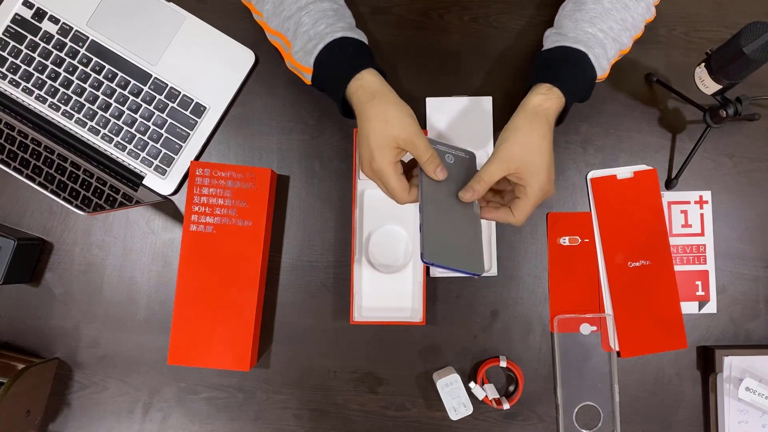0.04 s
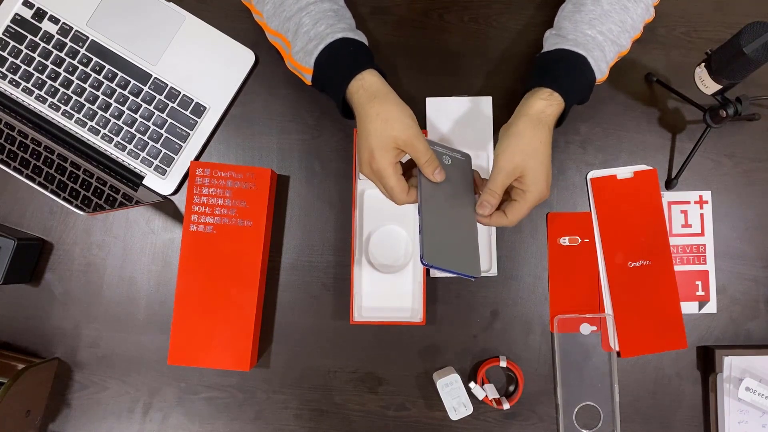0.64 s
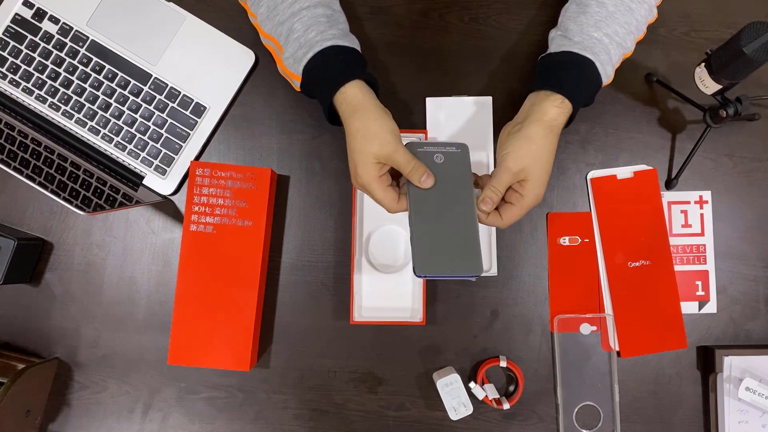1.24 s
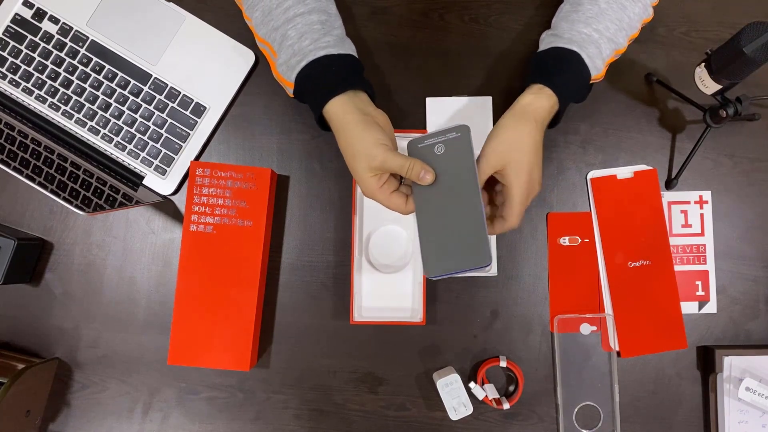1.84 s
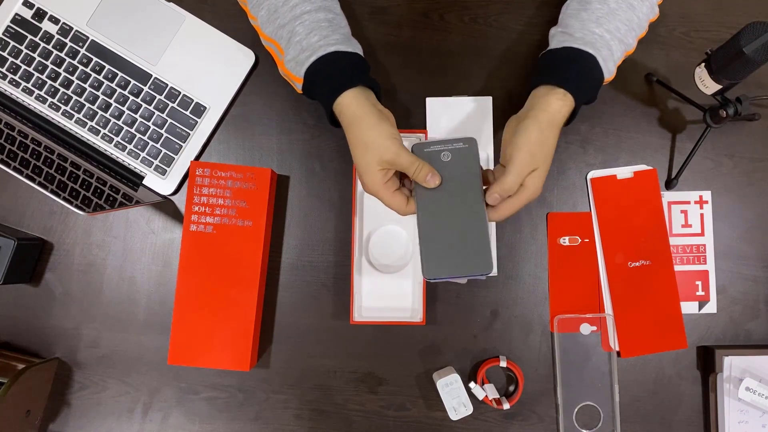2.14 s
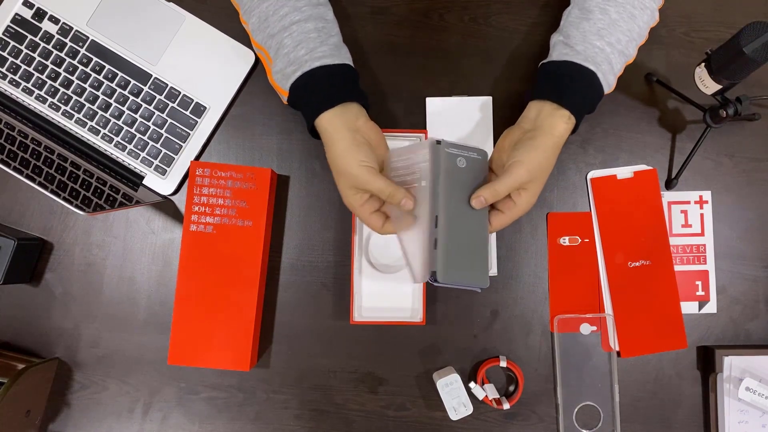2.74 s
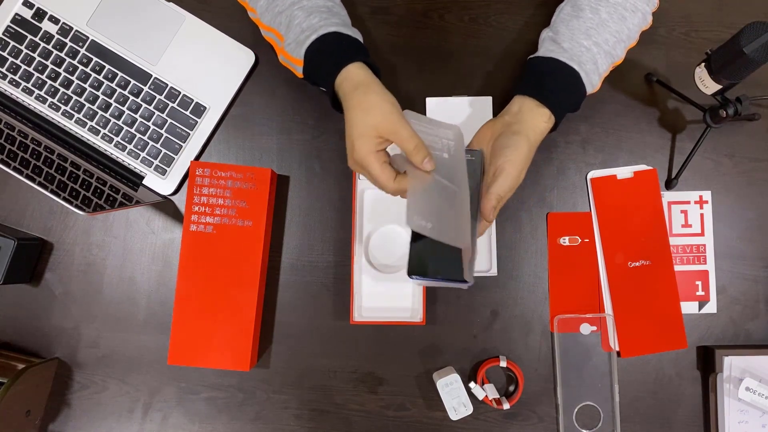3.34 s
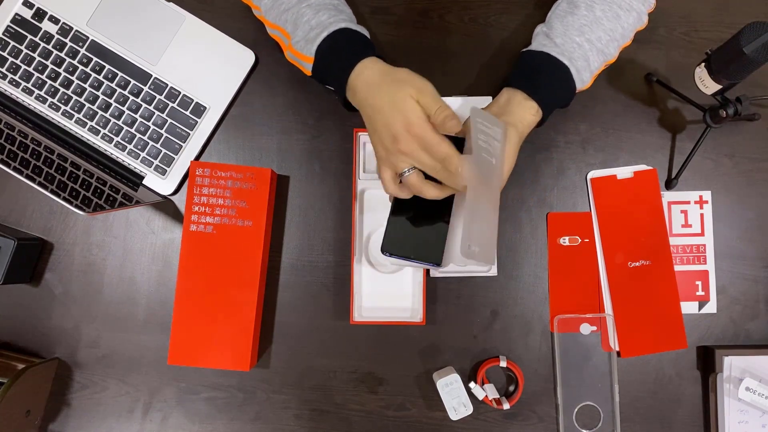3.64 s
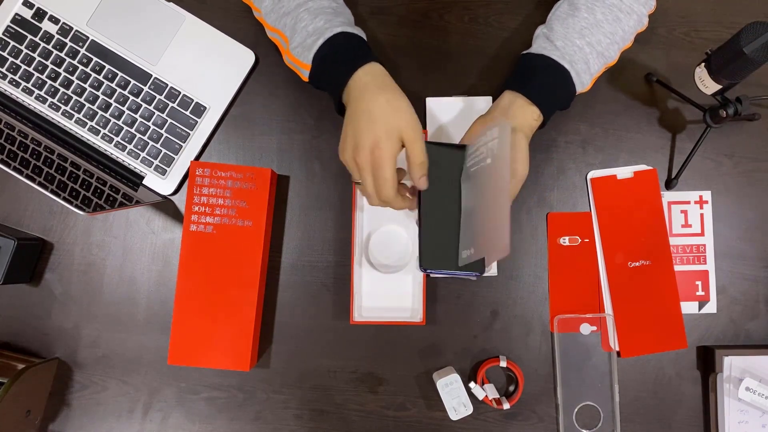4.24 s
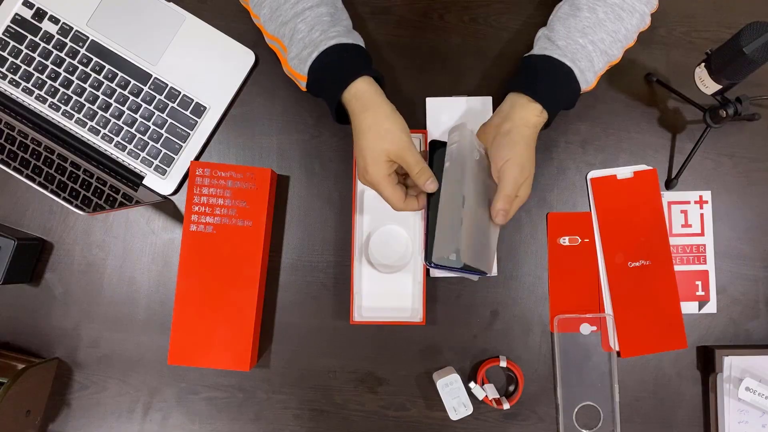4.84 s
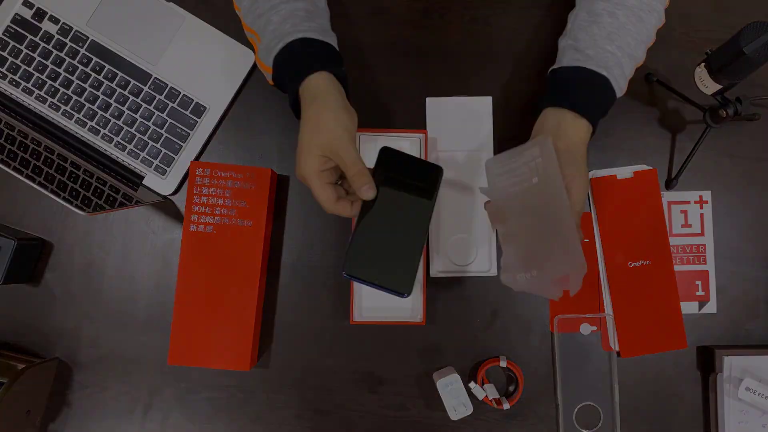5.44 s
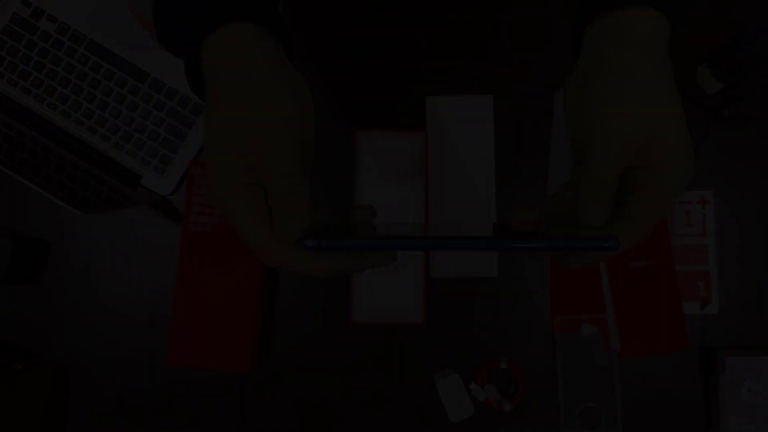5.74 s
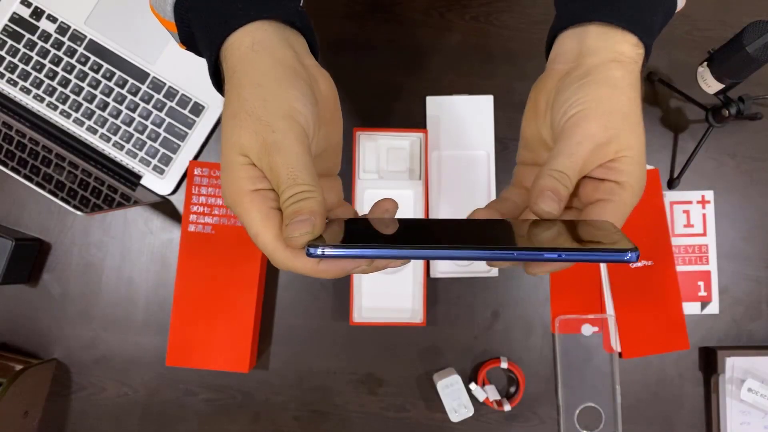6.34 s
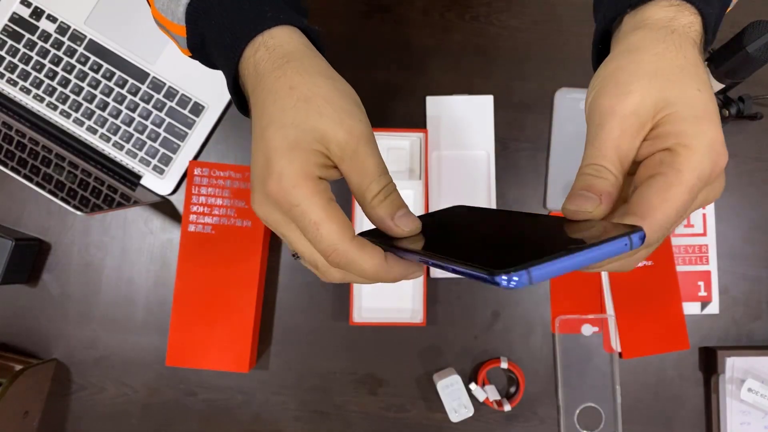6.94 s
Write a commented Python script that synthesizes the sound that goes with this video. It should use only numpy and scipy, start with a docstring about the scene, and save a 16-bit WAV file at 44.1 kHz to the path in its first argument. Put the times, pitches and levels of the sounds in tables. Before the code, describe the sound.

A thin plastic sleeve crackles and hisses as a phone is slid out, with soft bumps over a low room hum.

```python
"""A thin plastic sleeve crackles as a phone is slid out of it above a desk in a small room.
Creases buckle and ring the film's modes in sharp snaps, wrinkles pop as it bends, and stick-slip friction
makes it hiss and judder. Soft bumps set the desk or the hollow sleeve into damped vibration.
Hum and rumble lie underneath. Just after the crackling stops they drop abruptly to a much quieter
background with a thin tone, over which fingertips faintly brush the bare phone."""
import sys
import numpy as np
from scipy import signal
from scipy.fft import rfft, irfft, next_fast_len
from scipy.io import wavfile
from scipy.ndimage import uniform_filter1d

SR = 44100
rng = np.random.default_rng(int(sys.argv[2]) if len(sys.argv) > 2 else 0)


def file_out(sig):
    """Save sig as 16-bit WAV at sys.argv[1]."""
    # one column per channel
    cols = np.atleast_2d(sig).T
    # limit, then scale
    lim = np.clip(cols, -1, 1)
    pcm = np.round(lim * 32767).astype(np.int16)
    wavfile.write(sys.argv[1], SR, pcm)


N = 307801
TIME = np.arange(N) / SR
HANDLING_END_S, DROP_S = 5.63, 5.763
SNAP_WINDOW_S = .005  # a snap's level states its energy spread over this time


def undb(db):
    """Amplitude ratio of a level in decibels."""
    return 10 ** (np.asarray(db) / 20)


def unit(x):
    """Normalisation to an rms of 1."""
    return x / np.sqrt(np.mean(x ** 2) + 1e-20)


def add(track, sound, start_s):
    """Superposition: a sound joins the track at start_s."""
    i = max(int(start_s * SR), 0)
    track[i:i + len(sound)] += sound[:max(N - i, 0)]


def until(end_s):
    """A gate whose gain ramps from 1 to 0 in about 5 ms."""
    return np.clip((end_s - TIME) / 0.0051 + .5, 0, 1)


def walk(rate):
    """Slow random modulation: smoothed steps, rate per second, with an rms of 1."""
    hold = max(int(SR / rate), 1)
    steps = np.repeat(rng.standard_normal(N // hold + 1), hold)[:N]
    return unit(uniform_filter1d(uniform_filter1d(steps, hold), hold))


def strokes(rows):
    """Amplitude envelope of sliding motion: one Gaussian swell for each stroke."""
    return sum(undb(db) * np.exp(-((TIME - peak_s) / spread_s) ** 2) for peak_s, spread_s, db in rows)


def grains(size, rate, spread_db):
    """Shot noise: random impulses, rate per second, most small and a few large."""
    out = np.zeros(size)
    count = max(int(rate * size / SR), 1)
    where, height, sign = rng.random((count, 3)).T
    level_db = spread_db * np.minimum(-np.log(1 - height), np.pi)
    out[(where * size).astype(int)] = np.sign(sign - .5) * undb(level_db)
    return out


def colour(x, outline):
    """Minimum-phase filter, from the folded cepstrum of an outline of (frequency_hz, gain_db)."""
    size = next_fast_len(len(x) + 8192, True)
    hz, db = np.transpose(outline)
    gain = undb(np.interp(np.log(np.fft.rfftfreq(size, 1 / SR) + 1), np.log(hz), db))
    cepstrum = irfft(np.log(gain), size)
    cepstrum[1:size // 2] *= 2
    cepstrum[size // 2:] = 0
    return irfft(rfft(x, size) * np.exp(rfft(cepstrum)), size)[:len(x)]


def resonate(x, hz, width_hz):
    """Two resonators in cascade give one resonance with steep skirts; rms 1."""
    band = signal.iirpeak(min(hz, .45 * SR), hz / (1.5 * width_hz), fs=SR)
    return unit(signal.lfilter(*band, signal.lfilter(*band, x)))


def hum_and_air(tones, spectrum, air_db):
    """Tones waver in amplitude and phase over gently swelling coloured noise."""
    out = undb(air_db + .5 * walk(rate=6)) * unit(colour(rng.standard_normal(N), spectrum))
    for hz, db, waver in tones:
        phasor = (1 + waver * (walk(rate=4.5) + 1j * walk(rate=4.6))) / np.sqrt(1 + 2 * waver ** 2)
        phase = 2 * np.pi * (hz * TIME + rng.random())
        out += np.sqrt(2) * undb(db) * np.abs(phasor) * np.sin(phase + np.angle(phasor))
    return out


def background():
    """The noise floor: a rapid crossfade takes hum and rumble down to faint noise and a thin tone."""
    # room tones before and after the drop: pitch_hz, level_db, waver_ratio
    hum = [(22, -48.5, 0.1498), (101, -48, 0.074), (119, -64, 0.72), (180.6, -64.5, 0.5),
           (205.6, -66.5, 0.93), (305.7, -67.5, .5)]
    quiet_hum = [(206, -69, .03), (243, -85.5, 0.28), (370, -84, .3)]
    # room noise spectra before and after the drop: frequency_hz, gain_db
    air = [(15, -3.5), (28, 2), (55, -3), (85, -6.5), (140, -8), (230, -5), (320, -7.5), (420, -14),
           (600, -14.5), (850, -23), (1500, -26), (3000, -38.5), (9000, -40.5), (16000, -46)]
    quiet_air = [(18, -20), (32, -11), (50, 6.5), (80, -1), (150, -2), (280, -4), (500, 1.5), (800, -7.5),
                 (1400, -14), (4000, -21), (11500, -28.5), (14000, -41)]
    loud = hum_and_air(hum, air, air_db=-50.5)
    quiet = hum_and_air(quiet_hum, quiet_air, air_db=-72.5)
    gate = until(DROP_S)
    return gate * loud + (1 - gate) * quiet


def room(x, wall_s=0.0155, wall_db=-13, scatter_s=0.0032, build_s=0.0072, split_hz=6500):
    """Reverberation: a near wall's scattered reflection and a short tail whose treble dies first."""
    t = np.arange(SR * 2 // 3) / SR
    noise = rng.standard_normal(len(t))
    dull = signal.sosfiltfilt(signal.butter(2, split_hz, fs=SR, output="sos"), noise)
    wall = rng.standard_normal(len(t)) * (t > wall_s) * np.exp(-np.abs(t - wall_s) / scatter_s)
    response = undb(wall_db) * wall / np.linalg.norm(wall)
    for band, db, t60_s in ((dull, -8, 0.49), (noise - dull, -10.5, 0.36)):
        fade = np.exp(-np.log(1000) * t / t60_s) * (1 - np.exp(-t / build_s))
        response += undb(db) * band * fade / np.linalg.norm(fade)
    return signal.fftconvolve(x, response)[:N]


def fingers():
    """Friction noise: fingertips brush the bare phone in soft, uneven strokes."""
    # fingertip strokes: peak_s, spread_s, level_db
    brushes = [(5.8, 0.024, -74), (5.92, 0.039, -81), (6.18, .04, -82), (6.369, .06, -84.5),
               (6.76, 0.036, -85), (6.86, 0.026, -86)]
    # spectrum of skin on glass: frequency_hz, gain_db
    skin = [(800, -7), (4000, -2.5), (11000, -9), (14000, -19)]
    grip_db = 2 * walk(rate=90)
    return strokes(brushes) * undb(grip_db) * unit(colour(rng.standard_normal(N), skin))


def bumps(rise_cycles=.3):
    """Damped oscillation: soft contacts set the desk or the hollow of the sleeve swinging."""
    # soft thumps: start_s, level_db, pitch_hz, t60_s
    thumps = [(0.512, -37.5, 45, 0.8), (0.962, -28, 103, 0.05), (1.407, -25, 54, 0.18),
              (2.919, -39, 42.7, .4), (4.13, -40, 32.4, 0.53), (4.644, -42, 540, .04),
              (6.29, -59.5, 54.8, .35)]
    out, t = np.zeros(N), np.arange(SR // 2) / SR
    for start_s, db, hz, t60_s in thumps:
        swell = (1 - np.exp(-t * hz / rise_cycles)) ** 2 * np.exp(-np.log(1000) * t / t60_s)
        add(out, undb(db) * swell * np.sin(2 * np.pi * hz * t), start_s)
    return out


def film_radiation(x, cutoff_hz=340):
    """A light sheet radiates bass poorly, so it acts as a high-pass filter."""
    return signal.sosfilt(signal.butter(4, cutoff_hz, "highpass", fs=SR, output="sos"), x)


def effort(time_s):
    """The bending drive on the sleeve at time_s, in dB."""
    # how hard the hands bend the film: time_s, effort_db
    bends = [(0, -81), (1.0, -71), (1.58, -66.5), (1.69, -60.5), (1.83, -62.5), (1.92, -59), (2.02, -62),
             (2.19, -68.5), (2.27, -60), (2.47, -57.5), (2.62, -74), (2.74, -60), (3.0, -48.5),
             (3.1, -57.5), (3.55, -59.5), (4.05, -59), (4.18, -76), (4.3, -62), (4.96, -63), (5.03, -59),
             (5.38, -61.5), (5.62, -63)]
    return np.interp(time_s, *np.transpose(bends))


def rustle(bend_db=-2, slide_db=-1.5, creep_db=-6):
    """Bending buckles tiny wrinkles; sliding over glass and skin makes a hiss of stick-slip ticks."""
    # wrinkle resonances: pitch_hz, width_hz, level_db
    wrinkles = [(784, 470, 1.5), (1644, 680, -2.5), (2120, 440, 0.5), (2970, 750, -0.5), (3900, 820, 0.5),
                (4610, 1200, -5.5)]
    # strokes of the sliding film: peak_s, spread_s, level_db
    slides = [(.06, 0.053, -67.5), (.455, 0.013, -59), (.55, 0.088, -69), (1.075, 0.018, -59),
              (1.32, 0.23, -64), (2.12, 0.041, -56.5), (2.23, 0.052, -56), (2.47, 0.044, -50.5),
              (2.775, 0.042, -57.5), (3.21, 0.11, -53.5), (3.46, 0.16, -60.5), (3.578, 0.015, -49.5),
              (3.71, 0.075, -59), (3.895, 0.045, -56), (4.072, 0.022, -48), (4.245, 0.026, -52.5),
              (4.35, 0.048, -60.5), (4.5, 0.077, -55.5), (4.68, 0.022, -53.5), (4.87, 0.046, -60),
              (5.12, 0.094, -57), (5.57, 0.017, -52.5)]
    # spectrum of the sliding hiss: frequency_hz, gain_db
    hiss_spectrum = [(1000, -28), (3000, 0), (4600, -0.5), (6400, 1), (8700, 3.5), (11000, -1.5),
                     (13500, -2), (16000, -13)]
    bending = undb(effort(TIME))
    sliding = np.hypot(strokes(slides), undb(creep_db) * bending)  # bent film also creeps in the grip
    grip_db = 1.8 * walk(rate=110)
    # small, high wrinkles pop more often than large ones
    crackle = unit(sum(undb(db) * resonate(grains(N, rate=.13 * hz, spread_db=4), hz, width_hz)
                       for hz, width_hz, db in wrinkles))
    ticks = unit(grains(N, rate=12000, spread_db=6))
    catches = unit(grains(N, rate=150, spread_db=3))
    hiss = unit(colour(ticks + .48 * catches, hiss_spectrum))
    return (crackle * bending * undb(bend_db) + hiss * sliding * undb(slide_db)) * undb(grip_db)


def rubs():
    """Uneven stick-slip pulses drive the resonance of a stretched panel, swelling and dying away."""
    # film juddering on glass or fingers: peak_s, rise_s, fall_s, level_db, pitch_hz, width_hz
    judders = [(1.89, 0.03, .05, -60, 790, 700), (1.886, 0.016, .025, -60, 2700, 1000),
               (2.426, 0.027, .035, -52, 2300, 803), (2.9, 0.026, 0.071, -51, 2750, 1100),
               (3.02, 0.022, 0.046, -46, 2750, 890), (2.408, 0.0065, 0.05, -46, 4200, 1500),
               (2.43, 0.027, 0.044, -55, 570, 420), (2.1, 0.018, 0.09, -61, 7300, 1100),
               (2.895, 0.03, 0.051, -48, 980, 650), (3.23, 0.066, 0.09, -59, 9100, 640),
               (3.039, 0.074, 0.095, -57, 1000, 900), (3.6, 0.051, 0.052, -53.5, 2300, 700),
               (3.55, .08, .08, -63, 2100, 600), (3.73, .06, 0.047, -59, 2400, 540),
               (4.078, .014, 0.018, -52, 6900, 700), (4.462, 0.02, 0.02, -54.5, 4070, 700),
               (5.179, 0.02, 0.018, -65, 1450, 450), (4.8, .02, .026, -60, 1650, 450)]
    out, t = np.zeros(N), np.arange(-SR // 4, SR // 2) / SR
    for peak_s, rise_s, fall_s, db, hz, width_hz in judders:
        judder = resonate(grains(len(t), rate=700, spread_db=8), hz, width_hz)
        swell = np.exp(-np.where(t < 0, (t / rise_s) ** 2, t / fall_s))
        add(out, undb(db) * judder * swell, peak_s + t[0])
    return out


def taut_panels():
    """Directional radiation: taut panels facing away from the listener ring briefly into the room."""
    # pings of snapping panels: start_s, level_db, pitch_hz, width_hz
    pings = [(1.405, -35.5, 4220, 850), (2.103, -45, 7600, 1300), (2.9353, -38.5, 4600, 1100),
             (4.084, -43.5, 5680, 350), (4.0837, -45, 4020, 501.4), (4.0834, -49, 2300, 300),
             (4.4733, -38, 9100, 1100), (4.6442, -41, 1560, 800)]
    out, flick = np.zeros(N), signal.unit_impulse(1024)
    for start_s, db, hz, width_hz in pings:
        ping = resonate(flick, hz, width_hz) * np.sqrt(SNAP_WINDOW_S * SR / len(flick))
        add(out, undb(db) * ping, start_s)
    return out


def ring(modes, buckle_ms, slip=0.38, detune=0.029):
    """Modal response: a jump and a fading run of smaller slips excite each damped mode; rms 1."""
    size = 512
    t = np.arange(size) / SR
    hz, width_hz, db = np.transpose(modes)[:, :, None]
    push = slip * rng.standard_normal((len(hz), size)) * np.exp(-t * 1000 / (0.39 + 1.3 * buckle_ms))
    push[:, 0] = rng.choice([-1, 1], len(hz))
    tuned_hz = hz * (1 + detune * rng.standard_normal(hz.shape))
    decay = np.exp(-np.pi * width_hz * t) * np.sin(2 * np.pi * tuned_hz * t)
    jf = 1j * np.fft.rfftfreq(2 * size, 1 / SR)
    radiation = (jf / (jf + 0.37 * hz)) ** 3  # a small sheet radiates little below its resonance
    swing = irfft(rfft(push, 2 * size) * rfft(decay, 2 * size) * radiation)[:, :size]
    return unit(np.sum(undb(db) * swing / swing.std(axis=1, keepdims=True), axis=0))


def all_around(snap, blur_hz=2200, lowest_hz=600):
    """Averaging over all directions blurs a snap's peaks and notches into a smooth power spectrum."""
    spectrum, hz = rfft(snap, 2 * len(snap)), np.fft.rfftfreq(2 * len(snap), 1 / SR)
    power = np.abs(uniform_filter1d(np.abs(spectrum) ** 2, max(int(blur_hz / hz[1]), 1)))
    bass_cut = hz ** 2 / (hz ** 2 + lowest_hz ** 2)
    return irfft(np.sqrt(power) * np.exp(1j * np.angle(spectrum)) * bass_cut)


def faint_creases(most_per_s=8, busy_db=-61, median_hz=2400, spread_octaves=0.78,
                  facet_db=-2.5, buckle_ms=2.6, own_db=-1.5):
    """A random point process: harder bending buckles small creases more often and more loudly."""
    candidates = 400
    when, luck = rng.random((candidates, 2)).T
    strength, pitch = rng.standard_normal((candidates, 2)).T
    start_s = when * HANDLING_END_S
    per_s = most_per_s * np.minimum(undb(effort(start_s) - busy_db), 1)
    level_db = effort(start_s) + 6 + 0.5 * strength
    own_hz = np.minimum(median_hz * 2 ** (spread_octaves * pitch), SR / 4)
    chosen = np.flatnonzero(luck < per_s * HANDLING_END_S / candidates)
    return [(start_s[i], level_db[i], facet_db, buckle_ms, own_hz[i], own_db) for i in chosen]


def snaps(middle_crease_hz=2980, forceful_db=-31, hard_db=-26, aimed_db=-35):
    """Snap-through buckling of creases rings the film; returns the direct sound and the room's share."""
    # loud creases: start_s, level_db, facet_db, buckle_ms, own_hz, own_db
    # facet_db is relative to the middle modes; own_db, the crease's own ring, to all the film's modes
    creases = [(.1819, -54.5, 4, 0.76, 3670, -9), (.2593, -49, 18, 1.6, 7200, -10),
               (.4985, -61, 9, 2.5, 8000, -6), (1.3451, -49, 3, 1.2, 1700, -6),
               (1.4051, -28, 6, 0.68, 4500, 1.5), (1.6523, -48, -11, 1.7, 1830, -2),
               (1.683, -51, -11, 3, 1900, -7), (1.7363, -42.5, -21, 1.1, 1600, -5),
               (1.8223, -54, -14, 1, 3640, -3), (1.839, -41.5, -9, 0.76, 3845, 4),
               (1.8554, -34, -6, 0.98, 4100, -7), (1.8748, -38, -4, 2.3, 3400, 0),
               (1.883, -43, -3, 1, 2000, -1), (1.8962, -36.5, 7, 1.2, 3120, 4.5),
               (1.9239, -32.5, 10, 3.9, 1850, -4), (1.933, -32, 2, 0.26, 7100, -1),
               (1.954, -45.5, -6, 1.4, 3470, 12), (2.1036, -42.5, 2.5, 2.7, 5540, -1),
               (2.2772, -47, -18, 4.7, 1540, -5), (2.302, -48.5, -14, 1.2, 3130, 1),
               (2.3527, -28, -8, 0.63, 8500, -0.5), (2.3573, -34, 7, 1.2, 3925, 3),
               (2.4274, -43, 3, 1, 1983, -5), (2.4432, -41.5, -13, 3.1, 3970, -4),
               (2.4731, -44, -8, 0.44, 2310, -6), (2.703, -54.5, 9.5, 1, 5170, 1),
               (2.7404, -46, -12, 2.1, 840, -1.5), (2.838, -44.5, 4, 6, 4350, 1),
               (2.8642, -35.5, -6, 4.1, 3770, 2), (2.8678, -31, -5, 1.6, 1390, -7),
               (2.883, -45, -3, 1.8, 4300, 0), (2.8953, -37, -4, 2.3, 3700, -4),
               (2.9032, -35, 1, 1.4, 990, 1), (2.917, -43, -6, 0.8, 4800, 1),
               (2.9279, -29.5, 0.5, 0.52, 3720, -3), (2.9353, -27.5, 1, 1.3, 5000, 1.5),
               (2.943, -38, 3, 0.9, 5000, -1), (3.0017, -30, 0, 1.2, 3350, -3.5),
               (3.017, -46.5, 0, 2, 2960, -2), (3.0324, -39.5, 6, 1.8, 3940, 1),
               (3.059, -48, -3, 1, 3300, 1), (3.0779, -48, -12, 0.91, 3890, 4),
               (3.1021, -34.5, -20, 1.2, 3930, -3), (3.1383, -46, -10, 1, 3940, 3),
               (3.1897, -43.5, -5.5, 1.5, 2590, 1), (3.2198, -35.5, 1.5, 0.82, 2500, -8),
               (3.4521, -49, -14, 2.9, 1945, 14), (3.493, -50.5, 4, 0.7, 2160, -8),
               (3.5494, -47.5, -8.5, 1.5, 2160, 12), (3.6282, -50, -7, 3, 2160, 16),
               (3.646, -53, 1, 2.26, 2230, 8), (3.6875, -42.5, 2, 2, 2280, 12),
               (3.7137, -43.5, -12, 0.61, 2460, 15), (3.7304, -48.5, 2, 0.7, 2400, -2),
               (3.7524, -47, -13, 1.4, 2150, 9), (3.766, -46.5, -16, 2.4, 2274, 3),
               (3.82, -41.5, -7, 1.3, 2430, -6.5), (3.8535, -45, -19, 1.1, 3200, 5),
               (3.885, -49.5, -12, 1.2, 2100, 11), (3.9769, -48.5, -10, 4, 1915, 0.5),
               (3.9975, -49, 5, 2.7, 2296, -4.5), (4.0228, -52.5, 11, 1.5, 7900, -1),
               (4.0672, -48.5, 0, 4, 3926, -0.5), (4.0834, -40.5, -8.5, 1.6, 5636, 4),
               (4.2577, -49.5, -2, 1.3, 7800, -2), (4.3845, -51.5, -3.5, 1.3, 3510, -1),
               (4.437, -39.5, -4, 1.1, 2255, 6.5), (4.4435, -43.5, -9.5, 1.2, 2300, 2.5),
               (4.4733, -25.5, 7, 0.72, 5500, -3), (4.5107, -43, -3, 0.97, 4580, -0.5),
               (4.5961, -45.5, -3, 3.3, 4600, -1.5), (4.636, -44.5, -16, 3.1, 2496, 3.5),
               (4.6442, -20.5, 3, 0.57, 2750, -11.5), (4.7626, -48.5, -15, 1.7, 1800, 0),
               (4.8045, -45.5, -7, 3.4, 925, -4), (4.89, -52, -12, 1.63, 1800, 7),
               (4.9886, -42.5, -3, 1.6, 2850, -2), (5.0013, -41.5, -8, 2.4, 3080, -3),
               (5.0092, -40.5, 2, 0.57, 1800, -3.5), (5.053, -50, -12, 1.5, 1500, 3),
               (5.1585, -41, -6, 2.8, 1440, -1.5), (5.18, -49, -10, 3, 1410, -3),
               (5.2119, -44.5, -7, 2, 1610, -8), (5.272, -40, 0, 1.4, 7850, -1),
               (5.275, -39, 4, 2.2, 7650, -3), (5.4174, -50, 4, 1.4, 4000, 0),
               (5.4511, -39, -14, 0.29, 1620, -7), (5.4535, -37, -13, 1.7, 7900, -2),
               (5.505, -48.5, -3, 0.79, 7400, -4), (5.5195, -51, 0, 1.2, 5600, -5),
               (5.5778, -46.5, -3, 3, 1930, 2), (5.6113, -44.5, 0, 2.5, 3360, -0.5)]
    # film modes, from whole panels to small facets: pitch_hz, width_hz, level_db
    panel_modes = [(475, 270, -6.5), (960, 250, -9.5), (1700, 238, -3.5), (2330, 660, -1)]
    middle_modes = [(3105, 870, -5.5), (3700, 620, -1.5), (4520, 440, 2), (5530, 920, 0)]
    facet_modes = [(7360, 1100, 4.5), (8510, 1040, 5.5), (10080, 700, -2.5), (12070, 3300, -2),
                   (13400, 920, -14)]
    direct, spilled = np.zeros(N), np.zeros(N)
    for start_s, level_db, facet_db, buckle_ms, own_hz, own_db in [*creases, *faint_creases()]:
        panel_db = -1.5 - np.log2(own_hz / middle_crease_hz)  # small, high creases shake panels less
        panel_db -= 4.5 * (level_db > forceful_db)  # a forceful snap ends before the panels can follow
        # the hardest snaps are also the quickest and reach the highest modes
        db_per_octave = max(1.2 * (level_db + facet_db - hard_db), -6)
        facets = [(hz, width_hz, db + db_per_octave * np.log2(hz)) for hz, width_hz, db in facet_modes]
        families = ((panel_modes, panel_db), (middle_modes, 0), (facets, facet_db))
        film = unit(sum(undb(db) * ring(modes, buckle_ms) for modes, db in families))
        crease = ring([(own_hz, 300 + own_hz / 20, 0)], buckle_ms, detune=0)
        snap = unit(film + undb(own_db) * crease) * np.sqrt(SNAP_WINDOW_S * SR / len(film))
        # the loudest snaps face the listener, so the room gets a smaller share of them
        room_db = level_db - 0.23 * max(level_db - aimed_db, 0)
        add(direct, undb(level_db) * snap, start_s)
        add(spilled, undb(room_db) * all_around(snap), start_s)
    return direct, spilled


def scene():
    """Superposition of the sleeve's direct and reverberant sound, bumps, fingertips and background."""
    floor = background()
    direct, spilled = snaps()
    friction = rustle() + rubs()
    reverberation = room(spilled + taut_panels() + undb(-5.5) * friction)
    sleeve = until(HANDLING_END_S) * film_radiation(direct + friction + reverberation)
    return (sleeve + bumps() + fingers() + floor)[None]


def record(dry):
    """Band limiting: a steep low-pass filter removes the treble above 15.8 kHz."""
    return signal.sosfilt(signal.ellip(10, .2, 80, 15800, fs=SR, output="sos"), dry)


dry = scene()
out = record(dry)
file_out(out)
```